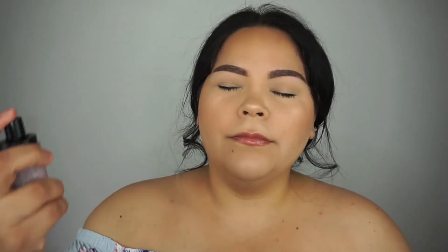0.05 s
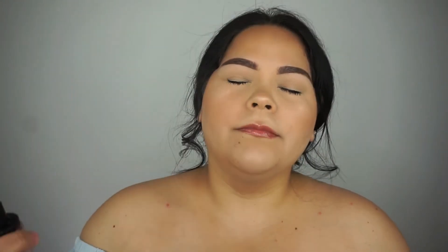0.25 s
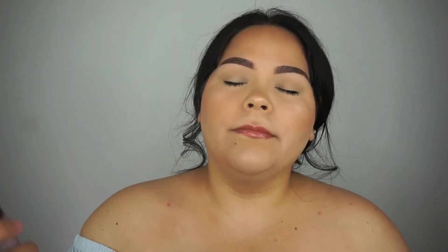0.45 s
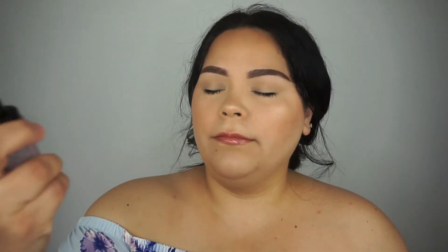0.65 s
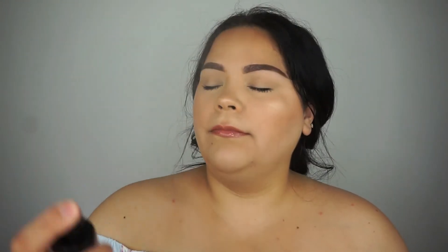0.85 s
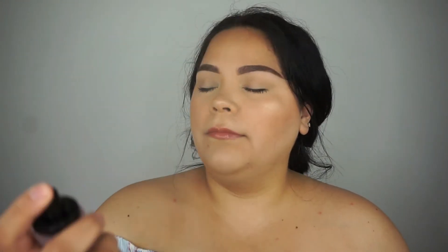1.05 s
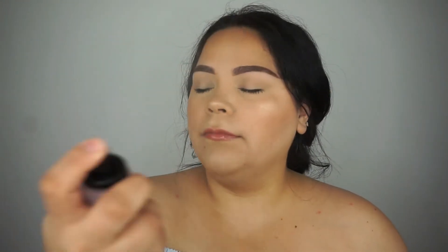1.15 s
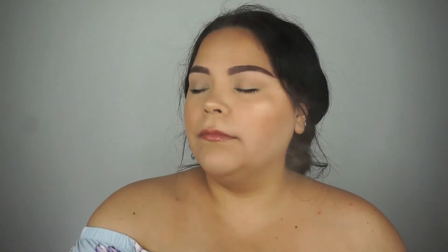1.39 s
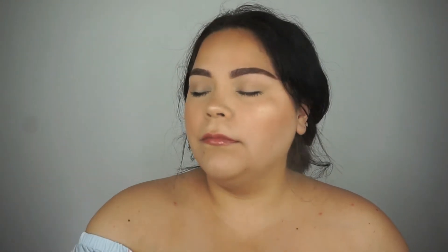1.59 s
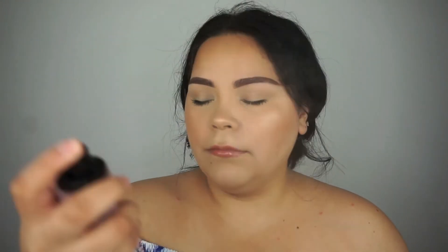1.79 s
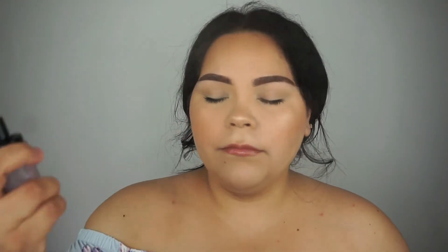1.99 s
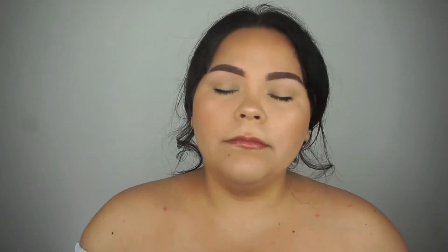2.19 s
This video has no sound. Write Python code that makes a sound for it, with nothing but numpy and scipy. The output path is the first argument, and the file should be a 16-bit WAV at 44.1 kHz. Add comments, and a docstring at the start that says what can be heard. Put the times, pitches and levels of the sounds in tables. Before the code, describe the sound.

Rapid run of mist sprays from a small plastic pump bottle, clicking and hissing in a small room

```python
"""A small pump bottle is pressed eleven times, about five a second, as a hand sweeps it before a face in a small room.
Each stroke: the plastic head clacks down and rattles, the valve may snap open, a puff of fine mist swells and fades,
and the spring ticks the head back. Knocks are short swelling tones plus noise ringing the head; mist is shaped noise.
Liquid gulps thud as low-heavy clicks. A stereo pair picks up the bottle direct and off the walls,
over a faint rumble of filtered noise and a sine hum."""
import sys
import numpy as np
from scipy import signal
from scipy.fft import rfft, irfft
from scipy.io import wavfile

SR = 44100
rng = np.random.default_rng(int(sys.argv[2]) if len(sys.argv) > 2 else 0)


def waveform_to_disk(signal):
    """Save audio, clipped to [-1, 1], as 16-bit WAV at the path in sys.argv[1]."""
    frames = np.transpose(np.atleast_2d(signal))
    scaled = np.clip(frames, -1, 1) * 32767
    samples = np.round(scaled).astype(np.int16)
    wavfile.write(sys.argv[1], SR, samples)


N = 98739  # samples


def amp(db):
    """Decibels to gain."""
    return 10 ** (np.asarray(db) / 20)


def evened(x):
    """Scales to rms 1."""
    return x / np.sqrt(np.mean(x ** 2) + 1e-20)


def read(points, hz):
    """Reads a table on a log-frequency axis."""
    f, value = np.transpose(points)
    return np.interp(np.log(hz + 1), np.log(f + 1), value)


def add(mix, s, sound):
    """Mixes a stereo sound in at time s."""
    part = mix[:, max(round(s * SR), 0):][:, :sound.shape[1]]
    part += sound[:, :part.shape[1]]


def stereo_noise(a, b, same):
    """Blends two independent signals into a left-right pair of the given likeness."""
    return np.array([a, same * a + np.sqrt(1 - same ** 2) * b])


# spectrum of the room's rumble, relative: f/Hz, level/dB per Hz
RUMBLE = [(15, -57), (25, -25), (59, -15.5), (123, -10), (166, -8), (270, -8), (326, -6.5), (624, -12.5),
          (775, -17), (1480, -14.5), (1740, -18), (14800, -38.5), (16000, -13.5)]
# how alike the rumble is at the two microphones: f/Hz, likeness (1 = identical)
RUMBLE_SAME = [(40, .7), (120, .65), (300, 0.17), (1000, 0.14), (8000, 0.081)]
RUMBLE_DB, HUM_HZ, HUM_DB = -57.5, 122.3, -77.5


def background():
    """Faint room rumble, wider in the treble than in the lows, and a steady sine hum equal on both sides."""
    hz = np.fft.rfftfreq(N, 1 / SR)
    a, b = rfft(rng.standard_normal((2, N)))
    same = np.clip(read(RUMBLE_SAME, hz), -1, 1)
    rumble = irfft(stereo_noise(a, b, same) * amp(read(RUMBLE, hz)), N)
    hum = np.sin(2 * np.pi * HUM_HZ * np.arange(N) / SR)
    return amp(RUMBLE_DB) * evened(rumble) + amp(HUM_DB) * evened(hum)


TREBLE_HZ = 5560  # where the treble shelf turns
THUD_HZ, THUD_OCTAVES = 1190, 0.34  # centre and width of the thud


def colour(points, treble_db=0, thud_db=0, size=1024):
    """Minimum-phase response with a given spectrum, a treble shelf and a thud bump."""
    hz = np.fft.rfftfreq(size, 1 / SR) + 1
    shelf = 1 - 1 / (1 + (hz / TREBLE_HZ) ** 4)
    bump = np.exp(-(np.log2(hz / THUD_HZ) / THUD_OCTAVES) ** 2)
    gain = evened(amp(read(points, hz))) * amp(treble_db * shelf + thud_db * bump)
    log_gain = np.log(gain)
    mirrored = np.r_[log_gain, log_gain[-2:0:-1]]
    # the Hilbert transform of the log gain gives the phase of a causal ring
    return np.fft.ifft(np.exp(signal.hilbert(mirrored).conj())).real


LAG_MS, LAG_MS_PER_DB = .035, .013  # lag of the right microphone: fixed part, and per dB of pan


def place(x, pan_db, size=64):
    """Sets the bottle before the microphones by level and by a small time lag that grows with the pan."""
    lag_s = (LAG_MS + LAG_MS_PER_DB * pan_db) / 1000
    k = np.arange(-size, size + 1)
    fractional_delay = np.sinc(k - lag_s * SR) * np.hanning(len(k))
    late = signal.fftconvolve(x, fractional_delay, "same")
    return np.array([x * amp(pan_db / 2), late * amp(-pan_db / 2)])


GRAIN_SPREAD_DB = 3.5  # scale of the uneven grain sizes


def grains(count, per_s):
    """Random train of small impulses of uneven size."""
    size = amp(GRAIN_SPREAD_DB * np.minimum(rng.exponential(1, count), 3))
    sign = rng.choice([-1., 1.], count)
    return size * sign * (rng.random(count) < per_s / SR)


# resonances of the plastic head, relative: f/Hz, level/dB
HEAD = [(40, -48), (150, -39.5), (450, -24.5), (700, -29), (1100, -19.5), (1550, -22), (2100, -10.5),
        (2450, -7.5), (2900, -5), (3250, -6.5), (3580, 2), (4050, -3), (4700, -12.5), (5600, -9),
        (7500, -17.5), (8600, -11), (9600, -8), (11000, -15.5), (13500, -18), (16000, -40)]
CLICK_DB, KNOCK_DB, CRUNCH_DB = -6, -2, -5
KNOCK_PEAK_S, KNOCK_SHAPE, CONTACT_S = 0.00056, 1.75, .0009  # CONTACT_S: crunch decay
RATTLE_PER_S, RATTLE_FADE_S, RATTLE_RISE_S = 1500, 0.011, 0.0013
ECHO_S, ECHO_DB = .003, -8.5  # a nearby surface throws each click back


def click(db, knock_hz, treble_db, thud_db, rattle_db, pan_db, crunch_db=0, count=6000):
    """A hollow knock of a few cycles; the crunch of contact and a brief chatter ring the plastic head."""
    t = np.arange(count) / SR
    swell = (t / KNOCK_PEAK_S * np.exp(1 - t / KNOCK_PEAK_S)) ** KNOCK_SHAPE
    knock = evened(swell * np.sin(2 * np.pi * knock_hz * t))
    crunch = evened(rng.choice([-1., 1.], count) * np.exp(-t / CONTACT_S))
    rattle_level = np.exp(-t / RATTLE_FADE_S) * np.minimum(t / RATTLE_RISE_S, 1)
    chatter = evened(grains(count, RATTLE_PER_S) * rattle_level)
    shell = colour(HEAD, treble_db, thud_db)
    crunch = signal.fftconvolve(crunch, shell)[:count]
    chatter = signal.fftconvolve(chatter, shell)[:count]
    crunch = evened(crunch - knock * np.mean(crunch * knock))  # the crunch never cancels the knock
    sound = amp(KNOCK_DB) * knock + amp(CRUNCH_DB + crunch_db) * crunch + amp(rattle_db) * evened(chatter)
    direct = place(amp(CLICK_DB + db) * sound / np.sqrt(count), pan_db)
    delays = np.round(ECHO_S * SR * rng.uniform(.7, 1.3, 2)).astype(int)  # one per microphone
    echo = np.array([np.pad(side, (d, 0))[:count] for side, d in zip(direct, delays)])
    return direct + amp(ECHO_DB) * echo


# the head is pushed down: t/s, level/dB, knock f/Hz, treble level/dB, rattle level/dB, pan L-R level/dB
PRESSES = [(.1497, -32.5, 3300, -21, 6.5, 4.5), (0.192, -17, 3420, -16, -0.5, 6),
           (0.534, -2, 3600, 2.5, 3.5, 3.5), (0.5389, -10.5, 3420, 1.5, 5, 10),
           (.7153, 0.5, 3620, -2.5, -7, 10.5), (0.7199, 4, 3600, 1, 1, 2), (0.9022, -1.5, 3540, 2, -4, 2.5),
           (1.1175, -5.5, 3760, -0.5, -14, 3.5), (1.32, -3, 3350, -1.5, -10, -2.5),
           (1.4972, -3, 3580, -3.5, 0.5, -1), (1.6794, -9, 3300, -3, -2, -2),
           (1.8772, -0.5, 3900, -0.5, -4.5, 2.5), (2.063, -5.5, 3730, -0.5, 0, 3.5)]
THUD_DB_PER_DB = 0.58  # a harder press thumps the bottle more


def presses():
    """The head clacks down: knock, crunch and rattle, with a thud that follows the level."""
    out = np.zeros((2, N))
    for s, db, knock_hz, treble_db, rattle_db, pan_db in PRESSES:
        add(out, s, click(db, knock_hz, treble_db, THUD_DB_PER_DB * db, rattle_db, pan_db))
    return out


# puffs of mist: t/s, length/s, level/dB, treble level/dB, pan L-R level/dB
PUFFS = [(0.188, 0.081, -42.5, -4.5, 2.5), (0.373, 0.087, -41.5, -1.5, 4), (.555, 0.089, -40, -1.5, 3.5),
         (0.732, 0.1, -37, 1.5, 1.5), (.927, 0.097, -38.5, -1.5, 1.5), (1.141, 0.091, -35.5, -3.5, 3.5),
         (1.345, 0.091, -37.5, -1, -1.5), (1.52, 0.096, -39.5, -2.5, -1), (1.704, 0.088, -37.5, -1.5, -2.5),
         (1.896, 0.088, -36, -5, 4.5), (2.082, 0.12, -38.5, -0.5, 1.5)]
# hiss of the nozzle, relative: f/Hz, level/dB per Hz
NOZZLE = [(150, -38.5), (400, -33), (800, -25), (1000, -29), (1200, -13.5), (1450, -15), (1750, -8.5),
          (2200, -4), (2850, 2), (3600, -4), (4300, -5), (5300, -5), (7000, -4), (9500, -2.5),
          (13000, -2.5), (15000, -1.5), (16200, -37)]
MIST_DB, SWELL_SKEW, SWELL_SHAPE = 0.5, 0.66, 0.97  # a skew below 1 makes the puff peak early
SPUTTER_PER_S, SPUTTER_DB = 260, -4


def mist(count=8192):
    """The jet hisses as pressure swells and sinks; droplets sputter in the head while liquid flows."""
    out, t = np.zeros((2, N)), np.arange(count) / SR
    for s, length, db, treble_db, pan_db in PUFFS:
        stroke = np.minimum(t / length, 1)
        flow = abs(np.sin(np.pi * stroke ** SWELL_SKEW)) ** SWELL_SHAPE
        hiss = signal.fftconvolve(flow * rng.standard_normal(count), colour(NOZZLE, treble_db))
        drops = evened(grains(count, SPUTTER_PER_S)) * np.sqrt(flow * (1 - stroke))
        sputter = amp(SPUTTER_DB) * signal.fftconvolve(drops, colour(HEAD, treble_db=-5, thud_db=4.5))
        add(out, s, place(amp(MIST_DB + db) * (hiss + sputter)[:count], pan_db))
    return out


# the head springs back: t/s, level/dB, knock f/Hz, rattle level/dB, pan L-R level/dB
RETURNS = [(0.296, -12, 3450, -2.5, 2), (0.317, -13, 3680, -3.5, 7), (.334, -16, 3570, 3.5, 4),
           (.4772, -16, 3300, -2, -5), (0.4976, -9.5, 3770, -4, 6), (.665, -13, 2840, 1, 2),
           (0.8656, -8, 3360, -10, 0), (1.0554, -12, 3650, -2.5, 1.5), (1.2428, -12.5, 3200, -25, -4),
           (1.269, -8.5, 3820, -8, 0), (1.4433, -10, 3140, -7, 2), (1.4715, -13.5, 3100, -23, 5),
           (1.6415, -15, 3230, 2.5, 3.5), (1.801, -8, 3400, -19, 0.5), (1.8285, -3.5, 3620, -25, 1),
           (2.02, -9.5, 3700, -6, 3), (2.2365, -16, 3680, -15, -9)]
RETURN_TREBLE_DB = -9
RETURN_CRUNCH_DB = -1.5  # the return is a softer, rounder contact


def returns():
    """The spring brings the head back with duller ticks."""
    out = np.zeros((2, N))
    for s, db, knock_hz, rattle_db, pan_db in RETURNS:
        add(out, s, click(db, knock_hz, RETURN_TREBLE_DB, 0, rattle_db, pan_db, RETURN_CRUNCH_DB))
    return out


# the valve snaps open and spits: t/s, level/dB, knock f/Hz, thud level/dB, pan L-R level/dB
SPITS = [(0.3726, 0, 3310, -6, 2.5), (0.3806, -10, 3500, 19.5, -1), (0.5662, 1, 3280, 9, 0),
         (0.5769, -0.5, 3160, -4, 1), (0.934, -14, 3330, 17.5, 0), (1.1444, -10, 3200, 16, -2),
         (1.3454, -4.5, 2810, 12, -1.5)]
SPIT_TREBLE_DB = -15


def spits():
    """The valve snaps open: dull clicks, most with a strong thud and all with little rattle."""
    out = np.zeros((2, N))
    for s, db, knock_hz, thud_db, pan_db in SPITS:
        add(out, s, click(db, knock_hz, SPIT_TREBLE_DB, thud_db, rattle_db=-10.5, pan_db=pan_db))
    return out


# liquid gulps back into the pump chamber: t/s, level/dB
GULPS = [(.482, -19), (0.678, -15), (1.061, -18), (1.281, -17), (1.839, -22), (2.032, -13.5)]
GULP_HZ, GULP_THUD_DB, GULP_RATTLE_DB = 3000, 21, -17.5


def gulps():
    """The chamber refills: quiet clicks with a heavy thud, level on both sides."""
    out = np.zeros((2, N))
    for s, db in GULPS:
        add(out, s, click(db, GULP_HZ, RETURN_TREBLE_DB, GULP_THUD_DB, GULP_RATTLE_DB, 0))
    return out


# room decay: f/Hz, t60/s
ROOM = [(200, 0.57), (1200, 0.35), (3300, 0.26), (8000, 0.24), (15000, 0.2)]
# how alike the reflections are at the two microphones: f/Hz, likeness (1 = identical)
ROOM_SAME = [(150, 1), (500, 0.48), (1300, 0.46), (2300, 0.75), (4000, 0.017), (12000, 0.017)]
FIRST_ECHO_S = 0.0022


def room_tail(count=1500, size=12):
    """Sparse reflections of random sign, each band dying at its own speed, most alike in the lows."""
    taps = np.zeros((2, count * size))
    at = np.arange(count) * size + rng.integers(0, size, (2, count))  # one tap per slot of `size` samples
    np.put_along_axis(taps, at, rng.choice([-1., 1.], at.shape), 1)
    hz, t, (a, b) = signal.stft(taps, SR, nperseg=256)
    same = np.clip(read(ROOM_SAME, hz), -1, 1)[:, None]
    decay = amp(-60 * t / read(ROOM, hz)[:, None])
    tail = signal.istft(stereo_noise(a, b, same) * decay, SR, nperseg=256)[1]
    tail = tail * (np.arange(tail.shape[1]) > FIRST_ECHO_S * SR)
    return tail / np.linalg.norm(tail, axis=1, keepdims=True)


DRIFT_S = .016  # time in which the moving bottle changes the pattern of reflections


def room(x, count=8, pan_db=-0.3):
    """As the bottle moves, the sound crossfades through a repeating cycle of reflection patterns."""
    spot = np.arange(N) / SR / DRIFT_S
    wet = np.zeros((2, N))
    for k in range(count):
        fade = np.sqrt(np.maximum(1 - abs((spot - k) % count - 1), 0))
        wet += signal.fftconvolve(x * fade, room_tail(), axes=1)[:, :N]
    return wet * amp([[pan_db / 2], [-pan_db / 2]])


AIM_DB = -5  # the nozzle points away: less treble reaches the microphones directly
CLICK_ROOM_DB, MIST_ROOM_DB = -2, 1.5


def scene():
    """Pump and mist, direct and off the walls, over the background."""
    clicks = presses() + returns() + spits() + gulps()
    spray = mist()
    dull = signal.lfilter(*signal.butter(1, TREBLE_HZ, fs=SR), spray)
    direct = clicks + dull + amp(AIM_DB) * (spray - dull)
    reflected = room(amp(CLICK_ROOM_DB) * clicks + amp(MIST_ROOM_DB) * spray)
    return direct + reflected + background()


EDGE_HZ = 16100


def record(dry):
    """The recorder's band limit: a steep linear-phase low-pass."""
    lowpass = signal.firwin(511, EDGE_HZ, window=("kaiser", 9), fs=SR)
    return signal.oaconvolve(dry, lowpass[None], "same")


dry = scene()
out = record(dry)
waveform_to_disk(out)
```